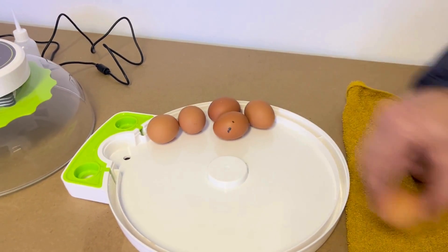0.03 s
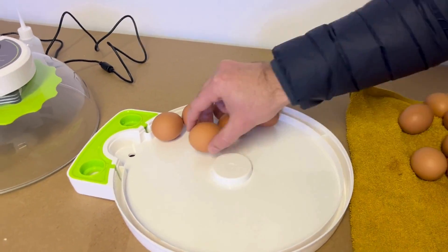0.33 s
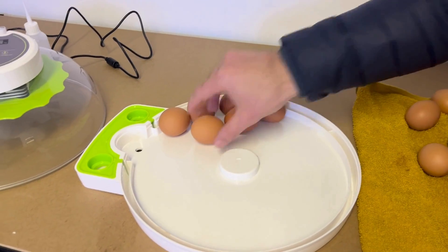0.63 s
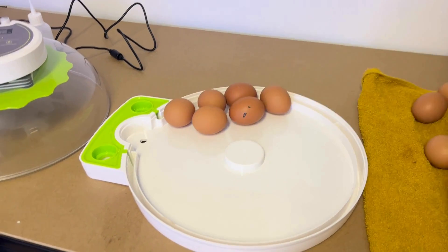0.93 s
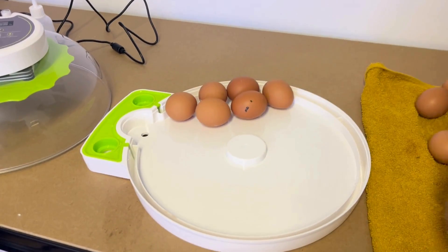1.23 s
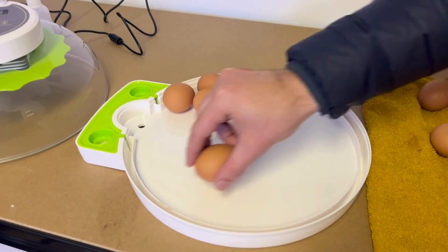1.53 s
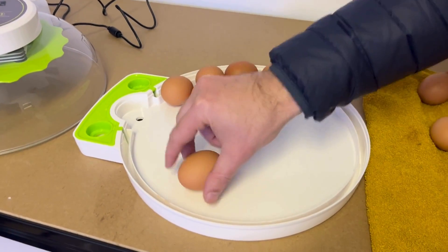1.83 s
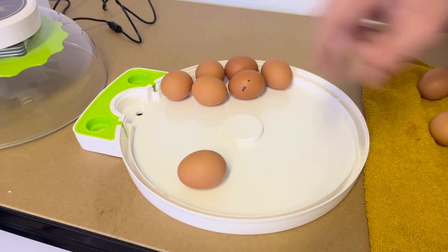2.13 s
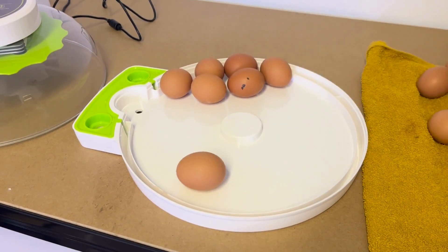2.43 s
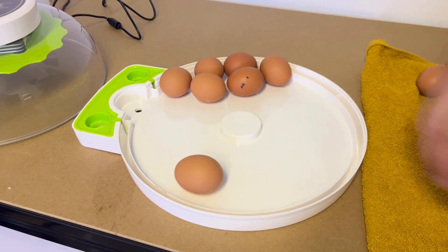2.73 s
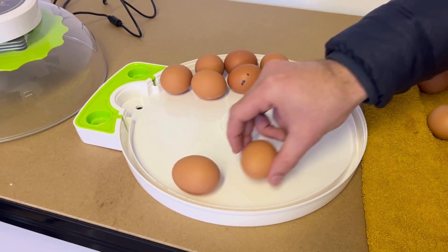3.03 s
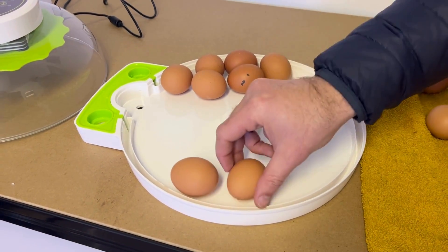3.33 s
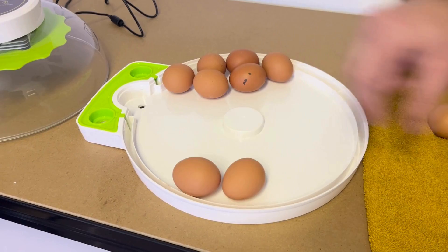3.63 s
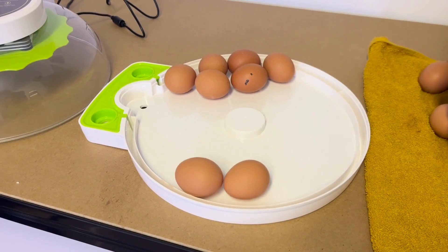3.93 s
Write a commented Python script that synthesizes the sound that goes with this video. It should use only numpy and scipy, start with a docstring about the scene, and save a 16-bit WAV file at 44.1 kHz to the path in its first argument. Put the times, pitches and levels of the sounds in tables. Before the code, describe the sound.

In a quiet room with a steady low hum, eggs tap and clack on a nearby plastic tray, their shells ticking together. After a pause one more egg lands, followed by a brief cloth rustle and soft table rumble.

```python
"""A low hum, rumble and hiss fill a quiet room and carry on underneath throughout.
Eggs are set down by hand on a round plastic tray that lies on a table: each contact knocks the
tray's floor, clacks its dense upper modes and thumps the table, and the room echoes it.
Along the way, shells tick against each other. At the end the last egg slides, cloth rustles
and the table rumbles as the hand goes back to the towel for the next egg."""
import sys
import numpy as np
from scipy import signal
from scipy.fft import rfft, irfft
from scipy.io import wavfile
from scipy.ndimage import uniform_filter1d

SR = 44100
rng = np.random.default_rng(int(sys.argv[2]) if len(sys.argv) > 2 else 0)


def unload_wav(signal):
    """Save mono or channel-first audio to the path in sys.argv[1] as 16-bit WAV at rate SR, clipped to [-1, 1]."""
    wavfile.write(
        sys.argv[1],
        SR,
        np.round(np.clip(np.atleast_2d(signal).T, -1, 1) * 32767).astype(np.int16),
    )


N = 176400
WIDE_HZ = 648  # below this, noise and echoes narrow towards mono

# slow swell shared by the hum and the rumble: time_s, gain_db
ROOM_SWELL = [(0, -7), (1.0, -1.5), (2.25, 2), (2.7, -3), (3.5, 1.5)]


def undb(db):
    return 10 ** (np.asarray(db) / 20)


def seconds(length):
    return np.arange(int(length * SR)) / SR


def on_log_axis(hz, points):
    """Reads (Hz, value) points on a log-frequency axis."""
    points = np.array(points, float)
    return np.interp(np.log(np.maximum(hz, 1)), np.log(points[:, 0]), points[:, 1])


def curve(points):
    """Gain over time from (s, dB) points."""
    return undb(np.interp(np.arange(N) / SR, *np.array(points, float).T))


def noise(colour, width=1, size=N):
    """Stereo noise with a mid of rms 1, shaped by (Hz, dB) points, falling steeply past their ends."""
    hz = np.maximum(np.fft.rfftfreq(size, 1 / SR), 1)
    skirts = (1 + (hz / colour[-1][0]) ** 20) * (1 + (colour[0][0] / hz) ** 20)
    mid, side = rfft(rng.standard_normal((2, size))) * undb(on_log_axis(hz, colour)) / np.sqrt(skirts)
    mid = irfft(mid, size)
    side = irfft(side * width * hz / np.hypot(hz, WIDE_HZ), size)
    return np.array([mid + side, mid - side]) / mid.std()


def drift(rate_hz):
    """Gliding random motion with a spread of 1."""
    step = int(SR / rate_hz)
    glide = uniform_filter1d(np.repeat(rng.standard_normal(N // step + 2), step), step)[:N]
    return glide / glide.std()


def fade(t, t60_s):
    return np.exp(-np.log(1000) * t / t60_s)


def rise(t, rise_s):
    return 1 - np.exp(-t / rise_s)


def ring(modes, t):
    """Struck modes of alternating sign; strength and pitch vary with the spot that the egg loads."""
    spot, load = rng.standard_normal((2, len(modes)))
    spot_db, detune = 1.4 * spot, 1 + .012 * load
    return sum((-1) ** k * undb(db + spot_db[k]) * np.sin(2 * np.pi * hz * detune[k] * t) * fade(t, t60)
               for k, (hz, db, t60) in enumerate(modes))


def add(out, start_s, sound):
    i = int(start_s * SR)
    out[:, i:i + sound.shape[-1]] += sound[..., :N - i]


def hum():
    """Low tones waver in pitch and level, each riding the room's swell by its own amount."""
    # hum tones: pitch_hz, base_level_db, swell_exponent
    tones = [(43.2, -54, .3), (80, -61.5, .5), (117.2, -60.5, 0.25), (146.1, -57, 2.1), (274.4, -57, 1.8)]
    waver_db, waver_hz = 2.5, 1.94
    out = 0
    for pitch_hz, level_db, swell_exponent in tones:
        gain = undb(level_db + waver_db * drift(4.815)) * curve(ROOM_SWELL) ** swell_exponent
        phase = 2 * np.pi * np.cumsum(pitch_hz + waver_hz * drift(12)) / SR
        out = out + gain * np.sin(phase)
    return np.sqrt(2) * out


def rumble():
    """A dark bed of room noise swells slowly."""
    # rumble spectrum: frequency_hz, relative_db
    colour = [(36, 3.5), (100, -2), (270, 0), (450, -9), (900, -19), (1500, -21), (2600, -33)]
    return undb(-47) * noise(colour) * curve(ROOM_SWELL)


def hiss():
    """A faint, bright hiss swells and sinks."""
    # hiss spectrum: frequency_hz, relative_db
    colour = [(1500, 0.5), (3000, 4), (4500, 2), (8000, -5), (9600, -0.5), (12500, -4), (15500, -10)]
    # hiss envelope: time_s, level_db
    envelope = [(.05, -81), (.18, -67.5), (.42, -75), (.56, -82.5), (.8, -67), (1.25, -76), (1.5, -66.5),
                (1.68, -72.5), (1.83, -78.5), (1.96, -69.5), (2.15, -68.5), (2.45, -70), (2.62, -80.5),
                (2.82, -69.5), (3.28, -75), (3.55, -68), (4, -69.5)]
    return noise(colour, width=0.53) * curve(envelope)


def tray_taps():
    """Eggs knock the tray, then the table; the spot sets the pitch, each clack has its own brightness."""
    # egg meets tray: start_s, knock_hz, knock_gain_db, clack_gain_db, clack_cutoff_hz, thump_gain_db
    contacts = [(0.4432, 542, -14.5, -24.5, 2460, -31.5), (0.4575, 554, -30, -43, 4000, -51),
                (.468, 677, -27, -52, 2000, -36.5), (0.6683, 600, -28, -37, 5500, -39.5),
                (0.6755, 590, -19.5, -32, 4300, -33), (0.7504, 530, -27.5, -35.5, 7960, -53),
                (.760, 527, -35, -30.5, 5100, -30.5), (.768, 577, -19.5, -32, 2510, -38.5),
                (.9246, 596, -56, -49, 5000, -70), (1.111, 610, -51, -36, 5960, -43),
                (1.1176, 594, -20.5, -38, 4700, -39), (1.207, 640, -48, -44, 3500, -40.5),
                (1.304, 594, -60, -48.5, 4010, -56), (1.6849, 575, -15.5, -24.5, 3740, -25),
                (3.199, 600, -33, -36.5, 6460, -36), (3.2146, 566, -37, -24, 1720, -28.5),
                (3.226, 450, -22.5, -37, 1390, -48), (3.248, 447, -33, -45, 1200, -35)]
    # crowded tray modes, heard as a noise burst: frequency_hz, relative_db
    crack_colour = [(470, 9), (900, 2), (1250, 3.5), (2200, -4.5), (3800, -6.5), (5200, -14), (7500, -19.5),
                    (15000, -14)]
    # clearest upper modes of the tray: pitch_hz, relative_db, t60_s
    clack_modes = [(787, -8.5, 0.1), (1026, -5.5, 0.056), (1160, -9, 0.052), (1275, -8.5, 0.071),
                   (1496, -9, 0.028), (1937, -3.5, 0.039), (2262, -12.5, 0.091), (3500, -3, 0.014),
                   (3874, -5, 0.028)]
    # side modes of the tray's floor: pitch_hz, relative_db, t60_s
    floor_modes = [(507.5, -15.5, 0.099), (695, -14, 0.12)]
    # modes of the table under the tray: pitch_hz, relative_db, t60_s
    table_modes = [(116.5, -2, 0.46), (151.6, -8, 0.52), (201.2, -4.5, 0.23), (277.5, -3, 0.22),
                   (339.7, -3, 0.21)]
    lean_left, thump_lag_s = undb([[1], [-1]]), 0.00695
    low_cut = signal.butter(2, 440, "high", fs=SR, output="sos")
    out, t = np.zeros((2, N)), seconds(1)
    for start_s, knock_hz, knock_db, clack_db, cutoff_hz, thump_db in contacts:
        crack = undb(-3.5) * noise(crack_colour, width=0.74, size=len(t)) * fade(t, t60_s=0.079)
        clack = (crack + undb(-5) * ring(clack_modes, t)) * rise(t, 0.0017)
        clack = signal.sosfilt(signal.butter(2, cutoff_hz, fs=SR, output="sos"), clack)
        add(out, start_s, undb(clack_db) * clack * lean_left)
        main_mode = np.sin(2 * np.pi * knock_hz * t) * fade(t, t60_s=.056)
        knock = (main_mode + ring(floor_modes, t)) * rise(t, 0.00042)
        add(out, start_s, undb(knock_db) * signal.sosfilt(low_cut, knock) / 2)
        thump = ring(table_modes, t) * rise(t, 0.001)
        add(out, start_s + thump_lag_s, undb(thump_db) * thump / 2)
    return out


def room_echoes(dry):
    """Diffuse echoes in octave bands start after a short gap; the lows last longest."""
    # room decay: frequency_hz, t60_s
    decay = [(120, 1.1), (550, .62), (1800, 0.3), (8000, 0.4)]
    # echo colour: frequency_hz, gain_db
    colour = [(100, -6.5), (500, -1), (2000, -6.5), (10000, -7.5)]
    predelay_s, tail_s = .007, .8
    t = seconds(0.94)
    hz = np.fft.rfftfreq(len(t), 1 / SR)
    mid, side = rfft(rng.standard_normal((2, len(t))))
    side = side * hz / np.hypot(hz, WIDE_HZ)
    stereo = np.array([mid + side, mid - side])
    tail = 0
    for centre_hz in 62.5 * 2 ** np.arange(9):
        band = np.maximum(1 - abs(np.log2(np.maximum(hz, 1) / centre_hz)), 0)
        tail = tail + irfft(stereo * band, len(t)) * fade(t, on_log_axis(centre_hz, decay))
    spectrum = rfft(tail)
    flattened = spectrum / np.sqrt(uniform_filter1d(abs(spectrum) ** 2, size=30, axis=1))
    tail = irfft(flattened * undb(on_log_axis(hz, colour)), len(t)) * rise(t, 0.00074)
    out = np.zeros((2, N))
    add(out, predelay_s, signal.fftconvolve(dry, tail * (t < tail_s), axes=1))
    return out


def shell_ticks():
    """Shells touch with a tiny bright snap and a brief ring."""
    # shell meets shell: start_s, gain_db
    touches = [(0.4573, -49), (0.7251, -34), (0.75, -39), (0.761, -55), (1.157, -47), (1.303, -53.5),
               (1.6836, -48), (3.215, -53)]
    # modes of an eggshell: pitch_hz, relative_db, t60_s
    shell_modes = [(5850, -10, 0.029), (6960, -7, 0.011), (9450, -13, 0.025), (11600, -7, 0.012)]
    out, t = np.zeros((2, N)), seconds(0.25)
    for start_s, gain_db in touches:
        burst = noise([(3200, 2.5), (15000, -18)], width=0.74, size=len(t))
        snap = undb(-5) * burst * fade(t, t60_s=0.011)
        add(out, start_s, undb(gain_db) * (snap + ring(shell_modes, t) / 2))
    return out


def rustles():
    """The last egg slides, then sleeve and towel rub as the arm draws back: grainy swells of noise."""
    # rubbing strokes: peak_s, rise_s, fall_s, level_db, low_hz, high_hz
    strokes = [(3.379, 0.047, 0.02, -63.5, 3100, 4530), (3.67, 0.035, 0.084, -66, 3770, 4850),
               (3.736, 0.071, 0.07, -47.5, 624, 2380), (3.88, 0.12, 0.14, -56, 500, 2570)]
    flutter_db, tilt_db = 1.5, -10
    out, t = 0, np.arange(N) / SR
    for peak_s, rise_s, fall_s, level_db, low_hz, high_hz in strokes:
        swell = np.exp(-((t - peak_s) / np.where(t < peak_s, rise_s, fall_s)) ** 2 / 2)
        friction = noise([(low_hz, 0), (high_hz, tilt_db)])
        out = out + friction * swell * undb(level_db + flutter_db * drift(150))
    return out


def table_jostle():
    """The table rumbles as the hand lands on the towel."""
    # spectrum of the jostled table: frequency_hz, relative_db
    colour = [(33, 2), (42, 1), (60, 1), (95, -21.5), (125, -1.5), (180, -20.5), (300, -23.5), (700, -29.5)]
    # jostle envelope: time_s, level_db
    envelope = [(3.58, -51), (3.67, -39), (3.72, -37.5), (3.77, -28.5), (3.81, -38.5), (3.86, -30.5),
                (3.93, -39), (4, -35.5)]
    landed = np.arange(N) / SR > envelope[0][0]
    return noise(colour) * curve(envelope) * landed


def scene():
    """The eggs and their echoes, then the hand's movements, all over the room tone."""
    eggs = tray_taps() + shell_ticks()
    return eggs + room_echoes(eggs) + table_jostle() + rustles() + hum() + rumble() + hiss()


def record(dry):
    """A steep low-pass trims the highest treble."""
    top_hz = 15700
    return signal.sosfilt(signal.ellip(8, .2, 70, top_hz, fs=SR, output="sos"), dry)


dry = scene()
out = record(dry)
unload_wav(out)
```